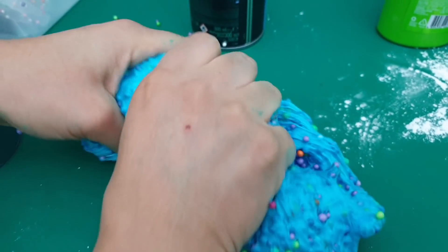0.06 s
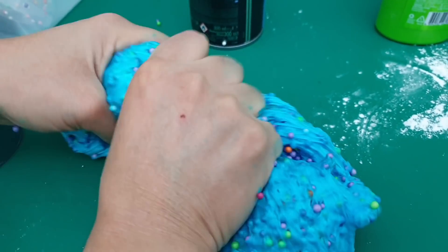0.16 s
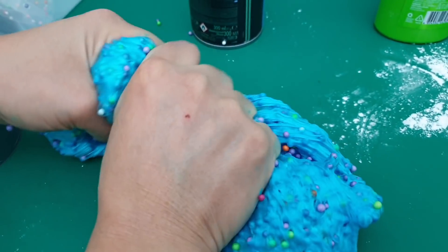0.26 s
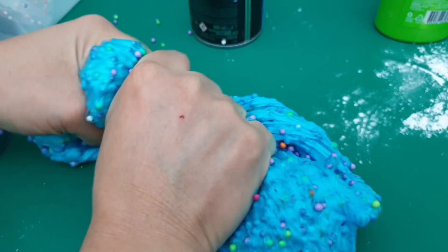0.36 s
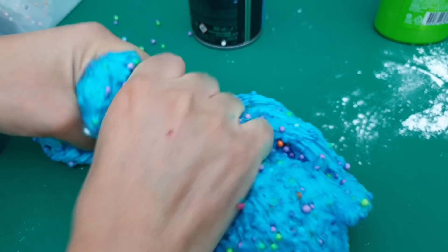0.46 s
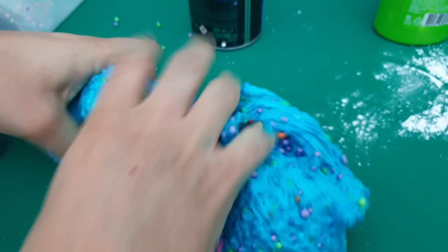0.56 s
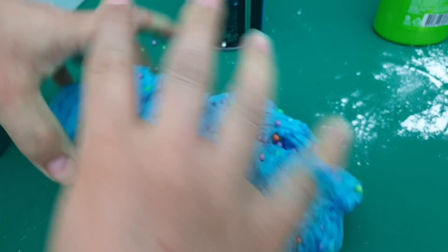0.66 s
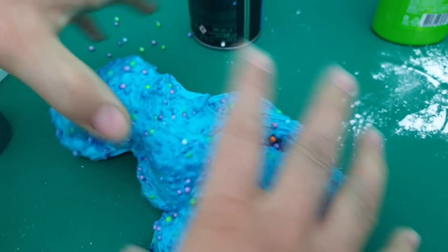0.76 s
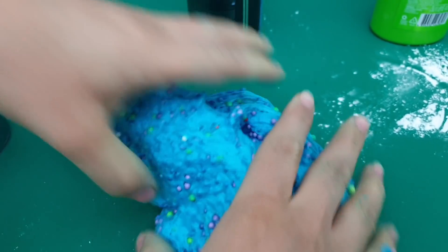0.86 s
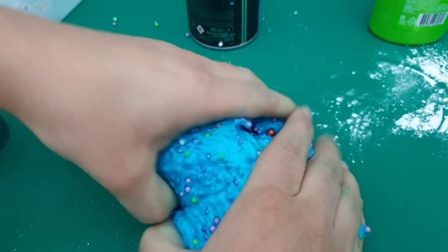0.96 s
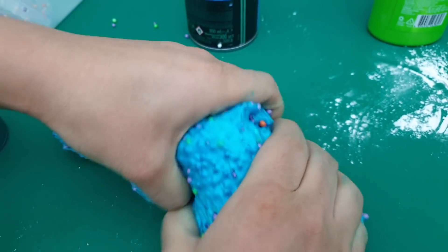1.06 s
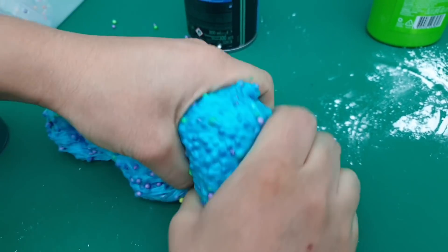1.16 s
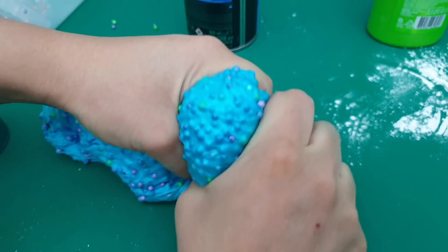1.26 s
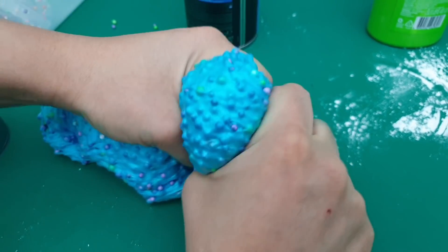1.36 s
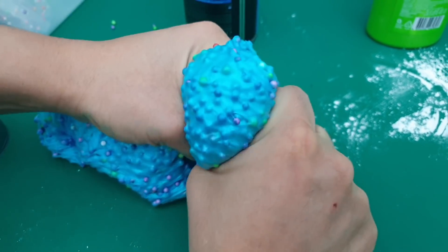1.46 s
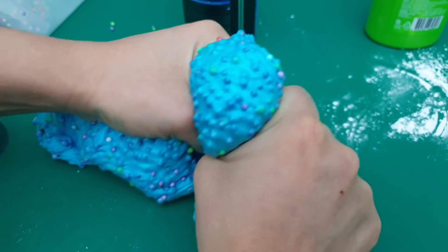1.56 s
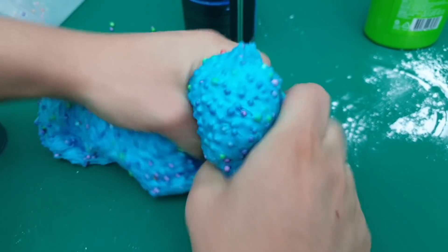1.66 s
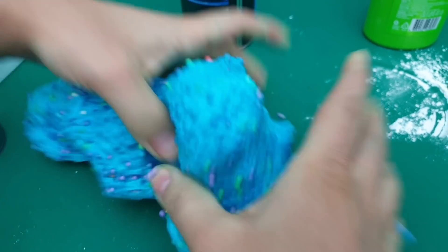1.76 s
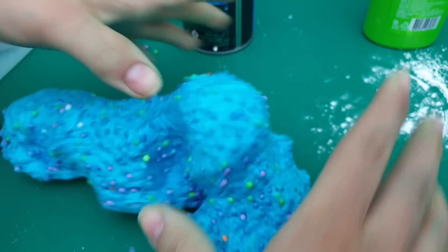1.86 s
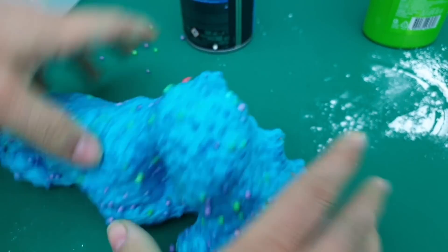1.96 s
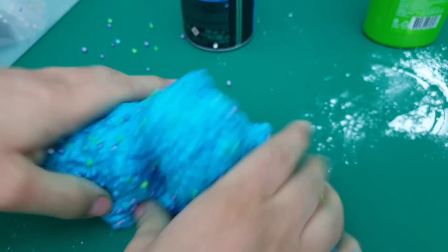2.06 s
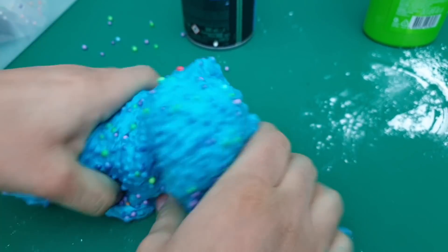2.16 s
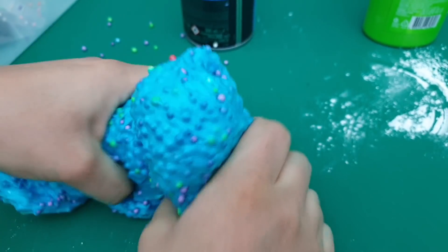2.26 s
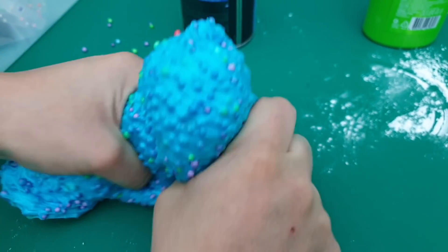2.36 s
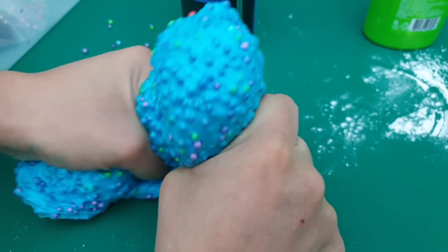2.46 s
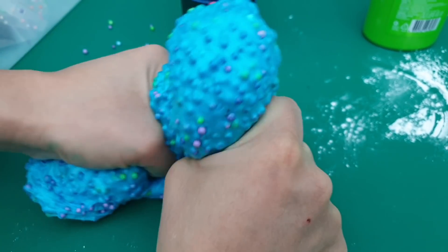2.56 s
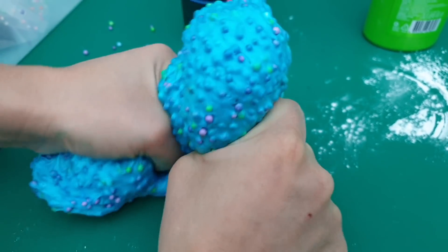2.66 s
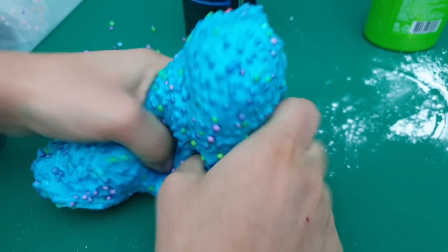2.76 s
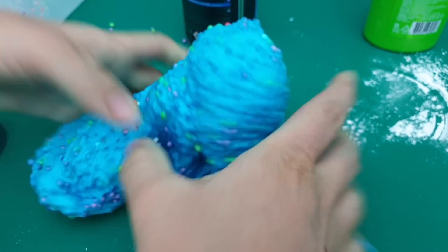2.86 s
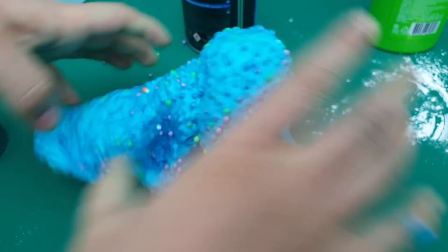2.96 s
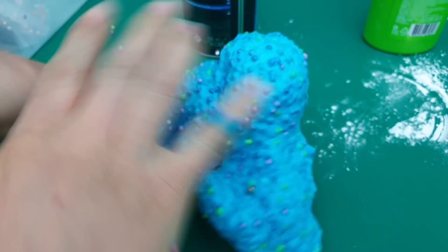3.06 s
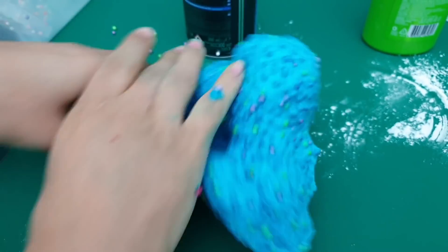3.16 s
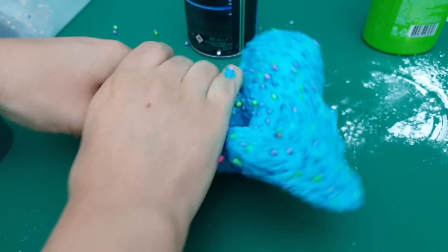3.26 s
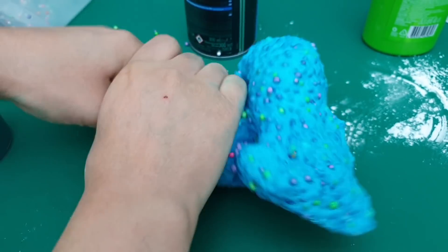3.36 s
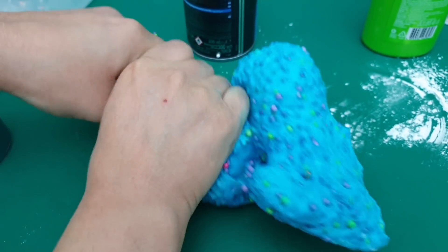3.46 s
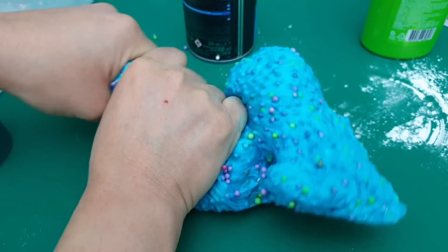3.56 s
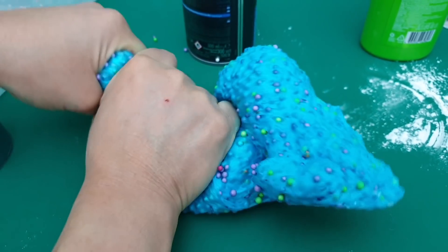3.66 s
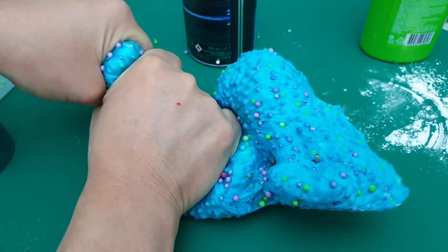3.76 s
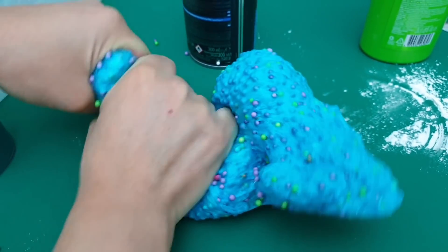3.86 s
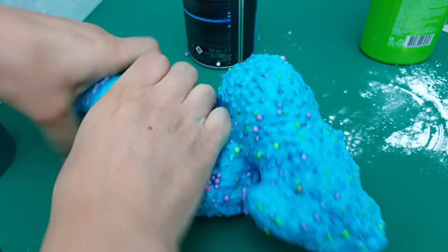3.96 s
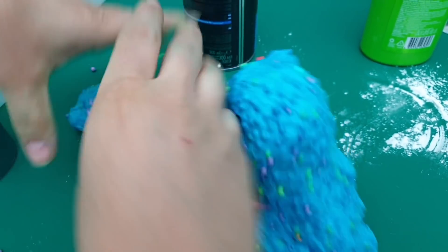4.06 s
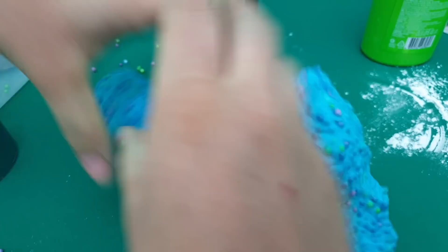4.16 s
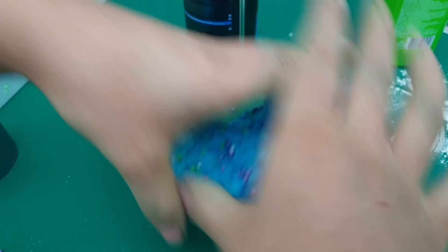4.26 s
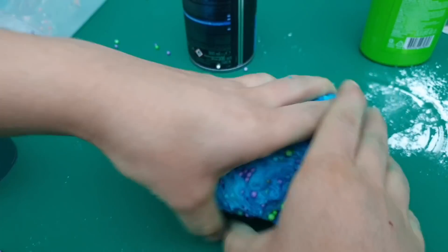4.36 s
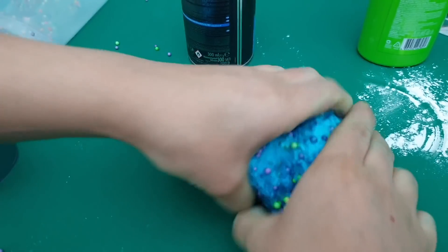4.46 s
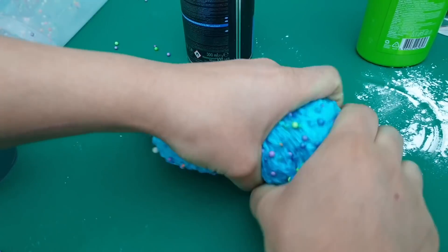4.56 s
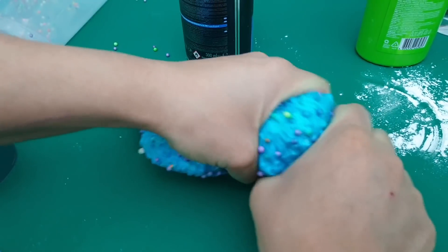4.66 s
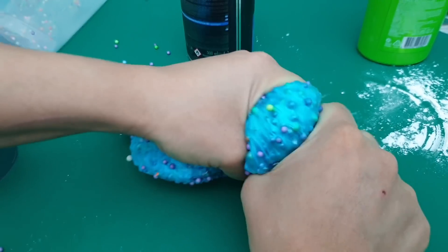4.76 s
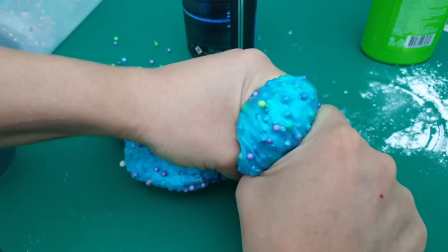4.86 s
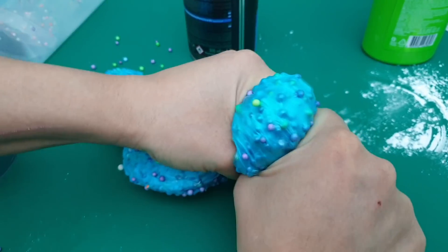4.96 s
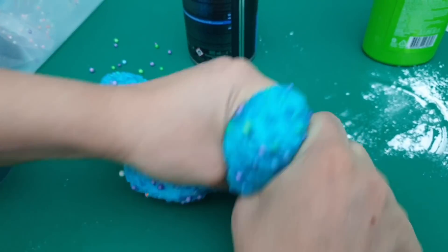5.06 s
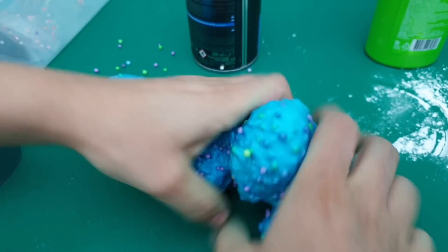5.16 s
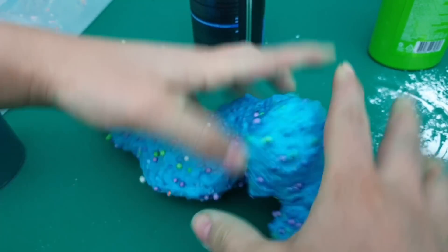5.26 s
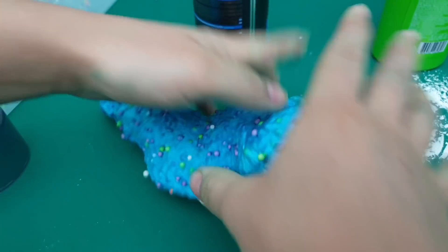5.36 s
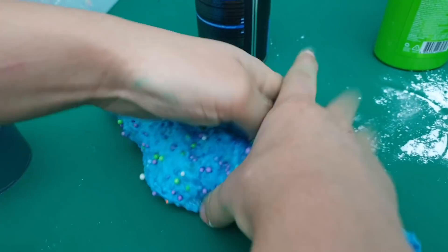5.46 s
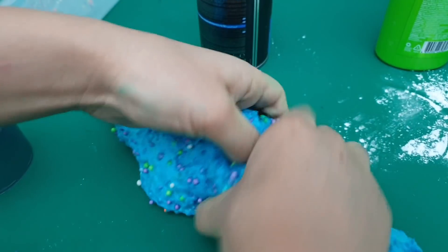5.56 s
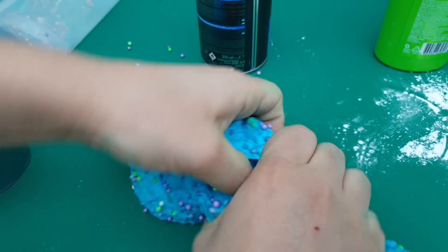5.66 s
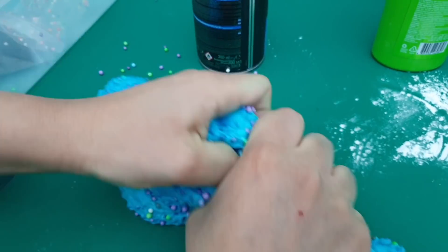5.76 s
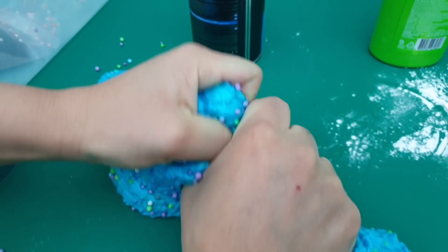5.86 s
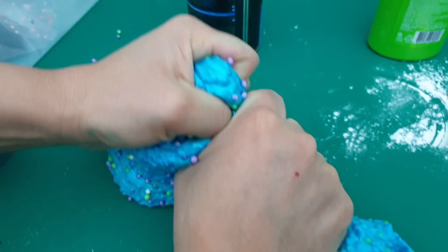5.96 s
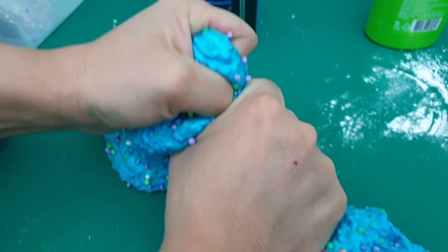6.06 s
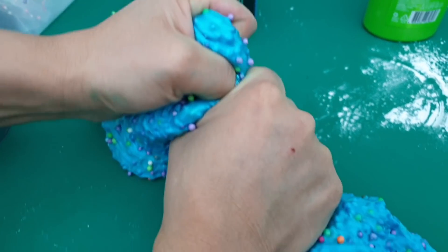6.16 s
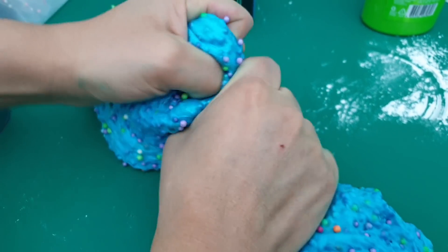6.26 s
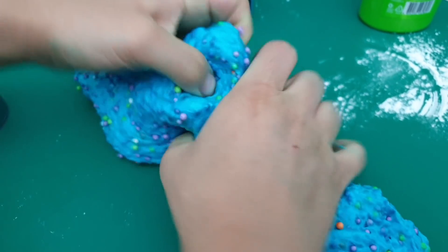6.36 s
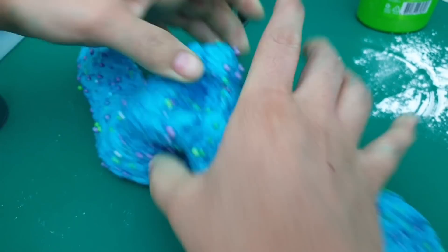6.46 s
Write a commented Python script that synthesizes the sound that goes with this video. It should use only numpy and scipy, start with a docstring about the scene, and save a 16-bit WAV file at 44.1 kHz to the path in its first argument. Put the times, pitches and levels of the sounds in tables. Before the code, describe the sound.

Close up in a small, bare room, beaded slime is squeezed six times, each squeeze a swell of bright crackling and loud bubble pops. Sticky fingers pull free with a soft squelch after each, and the lump bumps lightly on the tabletop. Four times escaping air hisses and puffs against the microphone, growing stronger each time, with the heaviest puff near the end.

```python
"""Kneading foam-bead slime

Two hands knead a lump of slime on a table, close to the microphone, in a bare room.
Each squeeze bursts trapped air: loud pops over a fine crackle, and now and then a jet of air that
hits the microphone. Between squeezes the fingers peel off with a soft squelch, and the lump thuds
on the table as the hands shove it."""
import sys
import numpy as np
from scipy import signal
from scipy.fft import rfft, irfft
from scipy.io import wavfile

SR = 44100
rng = np.random.default_rng(int(sys.argv[2]) if len(sys.argv) > 2 else 0)


def wav_out(sig):
    """Save sig, one row per channel (or a flat mono array), as 16-bit PCM at SR to the path in sys.argv[1]."""
    wavfile.write(sys.argv[1], SR, np.round(np.clip(np.atleast_2d(sig).T, -1, 1) * 32767).astype(np.int16))


N = 287532
TIME = np.arange(N) / SR


def from_db(db):
    """Decibels to gain."""
    return 10 ** (np.asarray(db) / 20)


def rms_one(x):
    """Scale to an rms of 1."""
    return x / np.sqrt(np.mean(x ** 2) + 1e-20)


def energy_one(x):
    """Scale each channel to an energy of 1."""
    return x / np.sqrt(np.sum(x ** 2, axis=-1, keepdims=True) + 1e-20)


def at_hz(points, hz):
    """Read a table on a log-frequency axis."""
    point_hz, value = np.transpose(points)
    return np.interp(np.log(np.maximum(hz, 1)), np.log(point_hz), value)


def band(x, low_hz, high_hz):
    """Butterworth band-pass."""
    return signal.sosfilt(signal.butter(2, [low_hz, high_hz], "band", fs=SR, output="sos"), x)


def split(x, hz, order=3):
    """The lows and highs of a crossover whose sum is flat."""
    filters = [signal.butter(order, hz, kind, fs=SR, output="sos") for kind in ("low", "high")]
    return [signal.sosfilt(sos, x) for sos in filters]


def resonate(x, hz, width_hz):
    """One resonance, with a gain of 1 at its peak."""
    radius = np.exp(-np.pi * width_hz / SR)
    feedback = [1, -2 * radius * np.cos(2 * np.pi * hz / SR), radius ** 2]
    return signal.lfilter(np.array([1, 0, -1]) * (1 - radius ** 2) / 2, feedback, x + 1e-18)


def colour(x, eq, size=4096):
    """Minimum-phase EQ: nothing rings ahead of an attack."""
    hz = np.arange(size // 2 + 1) * SR / size
    cepstrum = irfft(np.log(from_db(at_hz(eq, hz))))
    cepstrum[1:size // 2] *= 2
    cepstrum[size // 2 + 1:] = 0
    impulse = irfft(np.exp(rfft(cepstrum)))
    return signal.fftconvolve(x, impulse[None], axes=-1)[:, :x.shape[-1]]


def stereo_noise(shared, size):
    """White noise at the two microphone ports, with a fraction of its power common to both."""
    return np.sqrt(shared) * rng.standard_normal(size) + np.sqrt(1 - shared) * rng.standard_normal((2, size))


def pan(db):
    """Constant-power gains; a pan in dB is the level of left over right."""
    gains = from_db(np.array([[.5], [-.5]]) * db)
    return gains / np.sqrt(np.mean(gains ** 2, axis=0))


def delayed(x, s):
    """Delay by whole samples; a negative time gives no delay."""
    lag = int(np.clip(s * SR, 0, x.shape[-1] - 1))
    return np.pad(x, [(0, 0)] * (x.ndim - 1) + [(lag, 0)])[..., :x.shape[-1]]


def add(out, s, sound):
    """Mix a sound in at a time."""
    start = int(np.clip(round(s * SR), 0, N - 1))
    out[:, start:start + sound.shape[-1]] += sound[:, :N - start]


def grains(per_s, spread_db, cycles, low_hz, high_hz, pitches):
    """Random tiny bursts of uneven size; each pitch has its own place between the hands."""
    sizes = from_db(spread_db * np.minimum(rng.exponential(1, N), 3.5)) * rng.choice([-1, 1], N)
    clicks = sizes * (rng.random(N) < per_s / SR)
    pitch_index, out = rng.integers(0, pitches, N), np.zeros((2, N))
    for k, hz in enumerate(np.geomspace(low_hz, high_hz, pitches)):
        ring = resonate(clicks * (pitch_index == k), hz, hz / cycles)
        left_lag = rng.integers(-12, 8)
        out += np.array([np.roll(ring, left_lag), ring]) * pan(rng.normal(0, 4.4))
    return rms_one(out)


def grip_db(squeeze, s):
    """Crackle level in one squeeze: it swells as the fist tightens and sags as the air runs out."""
    start, tighten_s, ease_s, db, swell_db, sag_db, *_ = squeeze
    return db + np.interp(s - start, [0, tighten_s, tighten_s + ease_s], [-swell_db, 0, -sag_db])


def moments(squeeze, count):
    """Random times scattered through one squeeze."""
    start, tighten_s, ease_s, *_ = squeeze
    return start + (tighten_s + ease_s) * (np.arange(count) + rng.random(count)) / count


# The light rustle of fingers shifting on the lump. Each row: time in seconds, level in dB.
FINGER_RUSTLE = [(0, -66), (.73, -62), (.86, -92), (1.0, -73), (1.9, -62), (2.05, -73), (2.2, -62),
                 (2.97, -60), (3.1, -80), (3.2, -61), (4.2, -62), (4.32, -70), (4.46, -58), (5.3, -63),
                 (5.44, -73), (5.55, -64), (6.52, -67)]
# The squeezes. Each row: start, tightening and easing in seconds, crackle level at the tightest in dB,
# swell up to it in dB, sag after it in dB, fizz against crackle at the tightest in dB, pan in dB.
SQUEEZES = [(0.02, .27, .14, -40.5, 6, 1, -1, 1), (1.07, .35, .21, -38, 8, 8, -3.5, -1),
            (2.14, .36, .19, -38, 17, 14, -3, 1), (3.28, .43, .11, -41, 19, 4, -5, 0),
            (4.58, .22, .22, -36.5, 19, 10, -3.5, 1), (5.84, .14, .19, -39, 16, 11, -1, 0)]


def kneading(grab_s=.02, let_go_s=.02, peel_db=-7, touch_fizz_db=-9, fizz_db_per_db=.2):
    """Crackle envelope, fizz envelope and pan from light touches, peels, squeezes and flurries."""
    rustle = from_db(np.interp(TIME, *np.transpose(FINGER_RUSTLE)))
    crackle_gain = np.hypot(rustle, from_db(peel_db) * peel_envelope())  # a peel tears bubbles too
    fizz_gain, pan_db = crackle_gain * from_db(touch_fizz_db), 0
    for squeeze in SQUEEZES:
        start, tighten_s, ease_s, tightest_db, *_, fizz_db, squeeze_pan_db = squeeze
        outside = np.maximum((start - TIME) / grab_s, (TIME - start - tighten_s - ease_s) / let_go_s)
        db = grip_db(squeeze, TIME)
        grip = from_db(db) * np.exp(-np.maximum(outside, 0))
        brightness = from_db(fizz_db + fizz_db_per_db * (db - tightest_db))  # a looser fist is duller
        pan_db = np.where(grip > crackle_gain, squeeze_pan_db, pan_db)
        crackle_gain = np.hypot(crackle_gain, grip)
        fizz_gain = np.hypot(fizz_gain, grip * brightness)
    return *np.hypot([crackle_gain, fizz_gain], flurries()), pan_db


# The tone of the little bubbles. Each row: frequency in Hz, gain in dB.
CRACKLE_EQ = [(150, -14.5), (300, -6.5), (700, -4.5), (1400, -7), (2500, -5.5), (3800, -5.5), (5000, -2.5),
              (7100, -3), (9000, -29.5), (16000, -31)]


def crackle(peak_per_s=950, hiss_db=-9, fizz_hiss_db=-8):
    """A light touch rustles; a harder grip bursts more and louder bubbles over the hiss of leaking air."""
    crackle_gain, fizz_gain, pan_db = kneading()
    force = crackle_gain / crackle_gain.max() + .0014
    rate, bursting = peak_per_s * force ** .06, force ** .28
    bubbles = grains(rate, spread_db=5.5, cycles=.92, low_hz=378, high_hz=7950, pitches=12) * bursting
    bubbles = colour(bubbles + from_db(hiss_db) * stereo_noise(.2, N), CRACKLE_EQ)
    fizz = grains(rate, spread_db=5, cycles=1.2, low_hz=7500, high_hz=15000, pitches=6) * bursting
    fizz = band(fizz + from_db(fizz_hiss_db) * stereo_noise(.083, N), 6800, 17000)
    # the blend of bursts and hiss sets the texture, the envelopes alone set the level
    blend = np.hypot(bursting, from_db(hiss_db))
    return (rms_one(bubbles / blend) * crackle_gain + rms_one(fizz / blend) * fizz_gain) * pan(pan_db)


# The big air pockets bursting. Each row: start in seconds, crack level in dB, cavity pitch in Hz,
# low body level in dB, top fizz level in dB, pan in dB, time for the tear to fall 60 dB in seconds.
BIG_POPS = [(.0079, -33, 3300, -36, -43, 2, .006), (.0371, -22, 5300, -36, -28, 3, .01),
            (.0523, -24, 5400, -43, -36, -3, .003), (.0661, -24, 5900, -32, -43, 2, .002),
            (.07, -26, 6300, -39, -29, 2, .012), (.1207, -19, 6000, -35, -24, -10, .019),
            (.1356, -33, 3800, -33, -21, 4, .008), (.1541, -24, 4900, -53, -31, -6, .004),
            (.1992, -19, 5000, -27, -23, 6, .02), (.2197, -25, 7000, -55, -24, -11, .005),
            (.249, -23, 7000, -47, -17, -2, .005), (.252, -25, 4200, -34, -18, 0, .002),
            (.308, -25, 6400, -36, -15, 9, .004), (.3205, -30, 6800, -45, -22, 0, .003),
            (.3382, -24, 6800, -53, -16, 6, .005), (.3564, -34, 7100, -48, -21, 4, .016),
            (.3859, -33, 4700, -31, -18, 3, .007), (.388, -15, 5100, -32, -24, -2, .004),
            (.4423, -27, 6500, -49, -45, 1, .006), (.4652, -46, 7400, -53, -21, 3, .02),
            (.6949, -37, 4600, -53, -56, -9, .002), (1.068, -33, 6100, -43, -33, 1, .008),
            (1.1682, -24, 7300, -34, -25, 1, .013), (1.2893, -28, 5100, -49, -29, 2, .05),
            (1.3388, -27, 4900, -48, -36, -7, .015), (1.3497, -26, 5000, -56, -48, -5, .007),
            (1.3734, -30, 5600, -45, -35, -12, .016), (1.394, -31, 6800, -29, -31, 7, .007),
            (1.4079, -21, 5900, -48, -29, -12, .004), (1.4329, -20, 4900, -35, -46, -7, .005),
            (1.528, -26, 6200, -30, -29, 4, .01), (1.5464, -42, 2000, -27, -33, 1, .012),
            (1.5595, -26, 6200, -39, -28, -3, .014), (1.6476, -28, 5400, -40, -30, 0, .017),
            (2.1403, -27, 2500, -35, -30, 2, .012), (2.284, -19, 5300, -32, -28, 1, .007),
            (2.3059, -28, 5400, -39, -38, -7, .018), (2.393, -35, 5000, -30, -32, 4, .009),
            (2.4313, -29, 6100, -54, -33, -2, .005), (2.4732, -15, 5700, -33, -25, -10, .002),
            (2.4925, -24, 4200, -41, -37, 4, .003), (2.5264, -23, 2000, -26, -29, 2, .016),
            (2.5555, -35, 2000, -32, -23, -4, .012), (2.587, -25, 4500, -32, -24, 1, .03),
            (2.6794, -25, 6800, -47, -25, 1, .02), (2.924, -37, 2000, -35, -55, 2, .012),
            (3.3788, -32, 5100, -45, -32, 6, .003), (3.4287, -31, 2500, -35, -36, 5, .024),
            (3.6748, -24, 5500, -46, -23, 5, .003), (3.7234, -33, 6800, -32, -31, 2, .005),
            (3.7443, -37, 7200, -37, -29, 2, .006), (3.7661, -36, 4600, -58, -38, -6, .003),
            (3.7813, -22, 5600, -42, -17, 4, .016), (3.7975, -22, 4400, -39, -25, -2, .02),
            (3.8589, -33, 4200, -48, -30, -1, .002), (4.7026, -29, 4400, -40, -36, -2, .017),
            (4.7375, -21, 4300, -38, -38, -7, .016), (4.7546, -17, 6300, -26, -27, 1, .003),
            (4.7574, -15, 6000, -38, -19, 7, .012), (4.792, -19, 5300, -43, -23, -4, .026),
            (4.852, -23, 2000, -27, -25, 5, .014), (4.8597, -27, 7500, -51, -16, 2, .005),
            (4.8661, -16, 5000, -27, -21, -11, .008), (4.905, -19, 7100, -30, -25, 7, .024),
            (4.931, -21, 6900, -35, -17, -4, .016), (4.9793, -19, 5500, -38, -19, -7, .018),
            (5.0647, -34, 6700, -47, -32, 5, .026), (5.3502, -46, 3000, -44, -49, 0, .008),
            (5.935, -14, 6000, -26, -18, -1, .012), (5.9849, -31, 6700, -38, -18, 3, .008),
            (6.0261, -22, 6400, -34, -22, 0, .014), (6.1308, -27, 6200, -44, -42, -16, .006),
            (6.1431, -23, 7200, -27, -24, 4, .002)]


def pops(snap=2.6, bounce=.36, flutter_db=-26, flutter_t60=.045, cavity_db=-2, lag_s_per_db=.00003):
    """A film snaps, the sound bounces off the table, the torn edge flutters and the open cavity rings."""
    out, t = np.zeros((2, N)), np.arange(2400) / SR
    for s, crack_db, cavity_hz, body_db, fizz_db, pan_db, t60 in BIG_POPS + ticks() + small_pops():
        bounce_s = rng.uniform(.0004, .001)
        tear = stereo_noise(.25, t.size) * from_db(-60 * t / max(t60, .003))
        tear[:, 0] -= snap
        flutter = stereo_noise(.25, t.size) * from_db(flutter_db - 60 * t / flutter_t60)
        burst = tear + bounce * delayed(tear, bounce_s) + flutter
        below_fizz, fizz = split(burst, hz=7600, order=7)
        body, crack = split(below_fizz, hz=2520)
        _, body = split(body, hz=330)
        crack = crack + from_db(cavity_db) * resonate(crack, cavity_hz, width_hz=2600)
        layers = [(crack_db, crack), (body_db, body), (fizz_db, fizz)]
        pop = sum(from_db(db) * energy_one(layer) for db, layer in layers)
        lag_s = pan_db * lag_s_per_db  # the nearer port hears it a moment sooner
        pop = np.array([delayed(pop[0], -lag_s), delayed(pop[1], lag_s)])
        add(out, s, pop * np.sqrt(.005 * SR) * pan(pan_db))  # levels count as rms over 5 ms
    return out


def flurries(against_pop_db=-14.5, decay_s=.018):
    """Tiny bubbles follow each big pop out of its hole: a crackle envelope and a fizz envelope."""
    s, crack_db, _, _, fizz_db, *_ = np.transpose(BIG_POPS)
    power = np.zeros((2, N))
    power[:, (s * SR).astype(int)] = from_db(np.array([crack_db, fizz_db]) + against_pop_db) ** 2
    return np.sqrt(signal.lfilter([1], [1, -np.exp(-2 / (decay_s * SR))], power + 1e-18))


def small_pops(above_grip_db=4, body_db=-16, cavity_hz=5500, t60=.008):
    """Lesser pockets burst at random in each squeeze, as strong as the grip; rows for pops()."""
    rows = []
    for squeeze in SQUEEZES:
        *_, fizz_db, pan_db = squeeze
        for s in moments(squeeze, count=5):
            # each pop strays a little: pitch in octaves, the rest in dB
            level, octaves, body, fizz, side = rng.normal(0, [2, .2, 3, 3, 5])
            db = grip_db(squeeze, s) + above_grip_db + level
            hz = cavity_hz * 2 ** octaves
            rows.append((s, db, hz, db + body_db + body, db + fizz_db + fizz, pan_db + side, t60))
    return rows


# A hand lands on the lump and shoves it against the table.
# Each row: start in seconds, thud level in dB before the trim, sticky tick level in dB.
LANDINGS = [(.05, -41, -50), (1.035, -41, -53), (2.029, -41, -70), (2.093, -38, -58), (2.214, -39, -42),
            (2.42, -33.5, -45), (3.138, -39, -57), (3.35, -44, -46), (3.364, -36, -48), (3.775, -35, -45),
            (3.995, -35, -43), (4.135, -45, -48), (4.233, -36, -53), (4.28, -37, -66), (4.425, -41, -47),
            (4.442, -35, -53), (4.696, -40, -48), (5.075, -41, -50), (5.476, -37, -48), (5.549, -42, -54),
            (5.699, -34, -42), (5.92, -39, -46)]
# The tone of the table's rumble. Each row: frequency in Hz, gain in dB.
TABLE_EQ = [(25, -12), (50, -0.5), (80, -2.5), (118, -3), (165, -11.5), (260, -10), (400, -21.5),
            (900, -39), (3000, -61)]


def thuds(trim_db=-5.5, rise_s=.0015, t60=.21):
    """The soft lump shoves the table, which rumbles briefly."""
    out, t = np.zeros((2, N)), np.arange(12000) / SR
    push = (1 - np.exp(-t / rise_s)) * from_db(-60 * t / t60)
    for s, db, *_ in LANDINGS + nudges():
        rumble = colour(stereo_noise(.97, t.size) * push, TABLE_EQ)
        add(out, s, energy_one(rumble) * np.linalg.norm(push) * from_db(db + trim_db))
    return out


def ticks(body_db=-8, fizz_db=-10, cavity_hz=4500, t60=.012):
    """Skin meeting the slime traps a little air, which pops dully; rows for pops()."""
    return [(s, db, cavity_hz, db + body_db, db + fizz_db, 0, t60) for s, _, db in LANDINGS]


def nudges(shove_db=-45.5, spread_db=1.5, tug_db=-4):
    """Light shoves during each squeeze, and a tug on the table as each peel begins; rows for thuds()."""
    shoves = [(s, rng.normal(shove_db, spread_db))
              for squeeze in SQUEEZES for s in moments(squeeze, count=3)]
    tugs = [(s - half_s, db + tug_db) for s, db, half_s in PEELS]
    return shoves + tugs


# Jets of air that hit the microphone. Each row: start in seconds, wind level in dB,
# the rate its swing settles to in Hz, length of the swell in seconds, hiss level in dB.
AIR_JETS = [(0.321, -29, 51.5, 0.025, -29), (1.431, -24, 47.6, 0.025, -28.5),
            (4.894, -19, 45.6, 0.029, -21.5), (6.143, -7.8, 52.7, 0.03, -24.5)]
# The tone of a jet's hiss. Each row: frequency in Hz, gain in dB.
JET_EQ = [(300, -14.5), (1500, -28.5), (3000, -9.5), (5000, 1), (7200, 1.5), (9000, -9.5), (16000, -14)]


def air_jets(slap_s=.0011, snap_db=-11, snap_t60=.003, hiss_peak_s=.012, glide_s=.007, crossing_s=.00099):
    """A big pocket vents: a snap, a slap of air, slowing swings of pressure on the membrane, a hiss."""
    wind, hiss, t = np.zeros((2, N)), np.zeros((2, N)), np.arange(8000) / SR
    slap = 1.04 * np.exp(-t / slap_s)
    snap = from_db(snap_db - 60 * t / snap_t60)  # the slime's skin gives way at once
    flow = t / hiss_peak_s * np.exp(1 - t / hiss_peak_s)  # then the jet builds up and runs out
    for s, wind_db, swing_hz, length_s, hiss_db in AIR_JETS:
        swell = np.sqrt(t / length_s) * np.exp(-(2 * t / length_s) ** 1.53)
        turns = np.cumsum(swing_hz * (1 + .52 * np.exp(-t / glide_s))) / SR
        swing = np.sin(2 * np.pi * turns) * swell / swell.max()
        draught = np.array([delayed(swing, crossing_s), swing])  # it crosses the right port first
        add(wind, s, from_db(wind_db) * (draught - slap))
        air = rms_one(colour(stereo_noise(.2, t.size), JET_EQ))
        add(hiss, s, (snap + from_db(hiss_db) * flow) * air)
    return wind, hiss


def pull(s, half_s, threads_db=-13, threads_s=.055):
    """Envelope of one peel: a rounded swell, then a tail as the last threads let go."""
    t = np.clip(TIME - s, -1, 1)
    swell = np.exp(-.5 * np.minimum(np.abs(t / half_s), 10) ** 2)
    threads = (t > 0) * from_db(threads_db) * np.exp(-t / threads_s)
    return np.maximum(swell, threads)


# Fingers peeling off. Each row: time of the strongest pull in seconds, level in dB,
# half length in seconds.
PEELS = [(.635, -37.5, .044), (1.798, -36, .03), (2.883, -37, .04), (4.018, -39, .028), (4.15, -52, .025),
         (4.33, -66, .07), (4.665, -48, .022), (5.262, -39, .044), (5.545, -51, .03), (5.715, -46, .022),
         (6.43, -47, .042)]


def peel_envelope(uneven_db=3, slip_s=.012):
    """Envelope of all the peels; the skin comes free in uneven slips."""
    knots = np.arange(0, N / SR + .1, slip_s)
    slips_db = uneven_db * np.interp(TIME, knots, rng.standard_normal(len(knots)))
    return rms_one(from_db(slips_db)) * sum(from_db(db) * pull(s, half_s) for s, db, half_s in PEELS)


# The tone of slime leaving the skin. Each row: frequency in Hz, gain in dB.
SQUELCH_EQ = [(60, -3.5), (150, -10), (300, -6), (460, -11.5), (630, -4.5), (880, -17.5), (1100, -10),
              (1420, -15.5), (1800, -12), (2900, -16), (5200, -14), (8000, -24), (16000, -15)]


def squelch(rub_db=-4, suck_db=-4.5):
    """Sticky threads let go in a dull patter, and hollows under the palm suck in air and ring."""
    patter = grains(2600, spread_db=4, cycles=1.6, low_hz=240, high_hz=10600, pitches=10)
    hollows = grains(330, spread_db=6, cycles=8, low_hz=450, high_hz=790, pitches=6)
    rub = from_db(rub_db) * stereo_noise(.73, N)
    threads = rms_one(colour(patter + rub, SQUELCH_EQ))
    return rms_one(threads + from_db(suck_db) * hollows) * peel_envelope()


# The tone of the bare room's reverb. Each row: frequency in Hz, gain in dB.
REVERB_EQ = [(100, 11), (400, -2), (1000, 1.5), (2500, 4.5), (6500, -1), (9000, 0.5), (16000, 0.5)]
# The room's decay. Each row: frequency in Hz, time to fall 60 dB in seconds.
REVERB_T60 = [(150, 0.48), (800, 0.37), (2500, 0.39), (6000, 0.46), (15000, 0.45)]


def room_tail(predelay_s=.0009, build_s=.0014):
    """A diffuse tail that builds up within milliseconds and dies band by band."""
    t, tail = np.arange(32000) / SR, 0
    edges_hz = np.geomspace(70, 18000, 10)
    for low, high in zip(edges_hz, edges_hz[1:]):
        hz = np.sqrt(low * high)
        shared = 1 / (1 + (hz / 900) ** 2)  # centred lows, wide highs
        echoes = band(stereo_noise(shared, t.size), low, high)
        tail = tail + echoes * from_db(at_hz(REVERB_EQ, hz) - 60 * t / at_hz(REVERB_T60, hz))
    return energy_one(tail * np.clip((t - predelay_s) / build_s, 0, 1))


def room(x, wet_db=-6.5, patterns=3, crossfades_per_s=22):
    """The hands keep moving, so the sound passes from one pattern of echoes to the next."""
    place, wet = TIME * crossfades_per_s, 0
    for k in range(patterns):
        distance = np.abs((place - k + patterns / 2) % patterns - patterns / 2)
        send = np.sqrt(np.clip(1 - distance, 0, 1))
        wet = wet + signal.fftconvolve(x * send, room_tail(), axes=-1)[:, :N]
    return from_db(wet_db) * wet


# The colour of the quiet background. Each row: frequency in Hz, gain in dB.
ROOM_TONE_EQ = [(25, -17.5), (60, 15), (120, -1.5), (250, -12.5), (1000, -12.5), (5000, -32.5),
                (16000, -47)]


def room_tone(level_db=-71):
    """A faint, steady low rumble under everything."""
    return from_db(level_db) * rms_one(colour(stereo_noise(.78, N), ROOM_TONE_EQ))


def scene():
    """Slime and table sound in the room; the wind of the jets is only at the microphone."""
    wind, hiss = air_jets()
    slime = pops() + crackle() + squelch() + thuds() + hiss
    return slime + room(slime) + wind + room_tone()


# The two microphone ports differ in colour. Each row: frequency in Hz, left over right in dB.
PORT_BALANCE = [(300, 0), (1200, .4), (2500, -.3), (5000, -4.2), (7000, -2.5), (9000, 3), (16000, .5)]


def record(dry, ceiling=2.5, cutoff_hz=16100):
    """Each port adds its colour, the sharpest peaks are rounded off, and the top is cut."""
    left = colour(dry[:1], [(hz, db / 2) for hz, db in PORT_BALANCE])
    right = colour(dry[1:], [(hz, -db / 2) for hz, db in PORT_BALANCE])
    rounded = ceiling * np.tanh(np.vstack([left, right]) / ceiling)
    return signal.sosfilt(signal.ellip(10, .1, 70, cutoff_hz, fs=SR, output="sos"), rounded)


dry = scene()
out = record(dry)
wav_out(out)
```